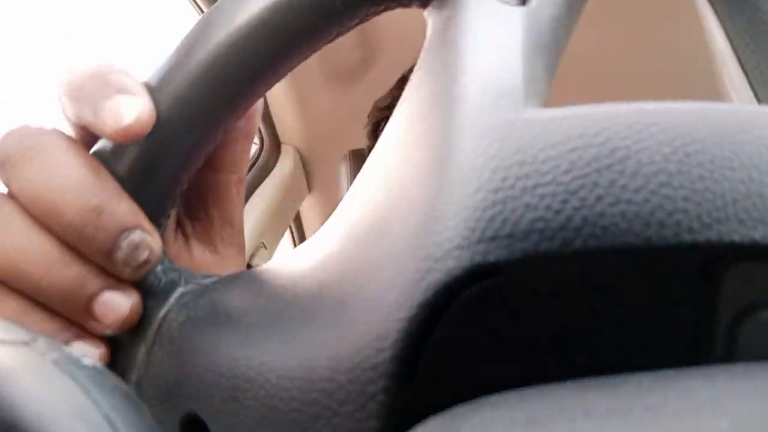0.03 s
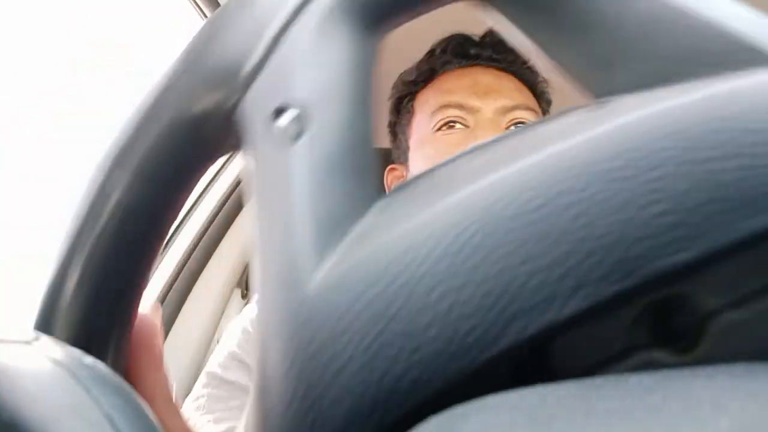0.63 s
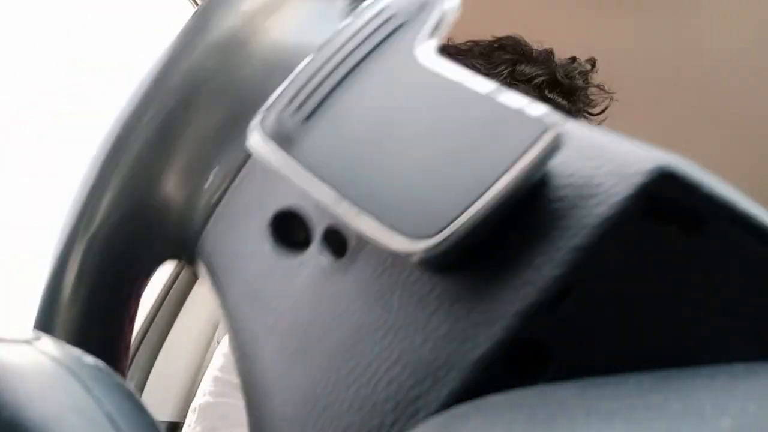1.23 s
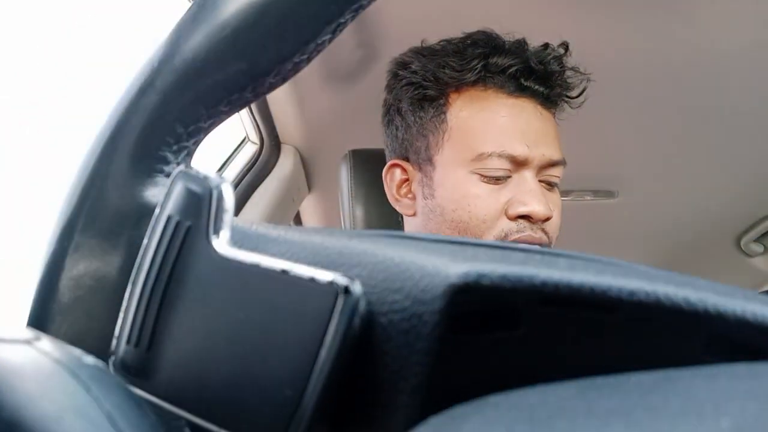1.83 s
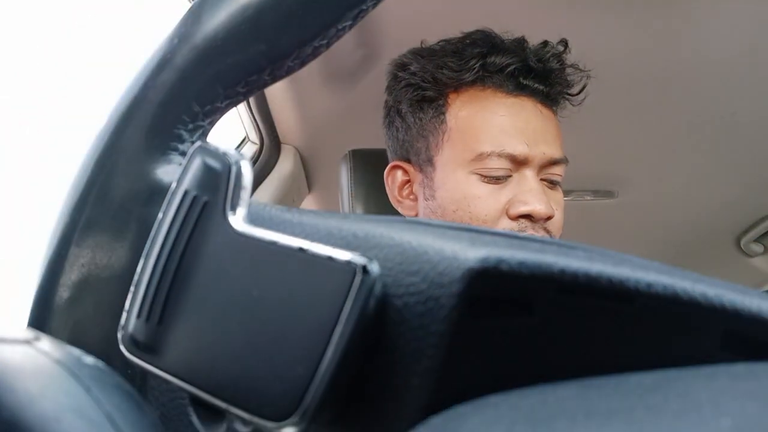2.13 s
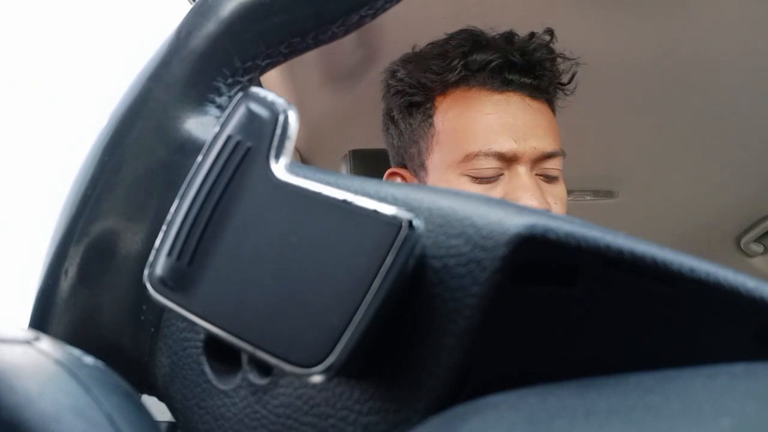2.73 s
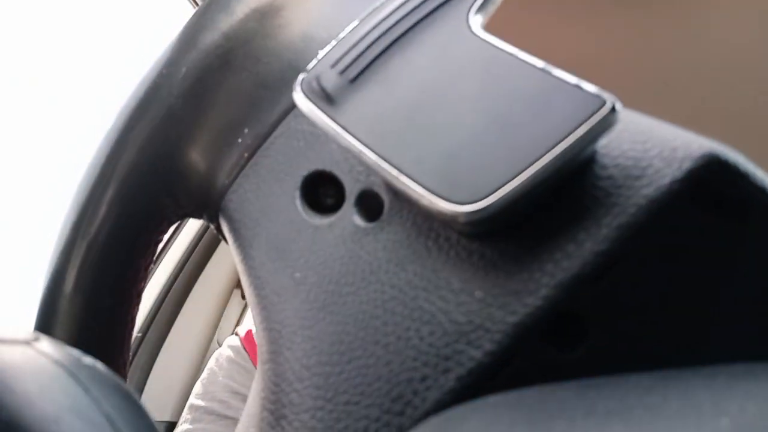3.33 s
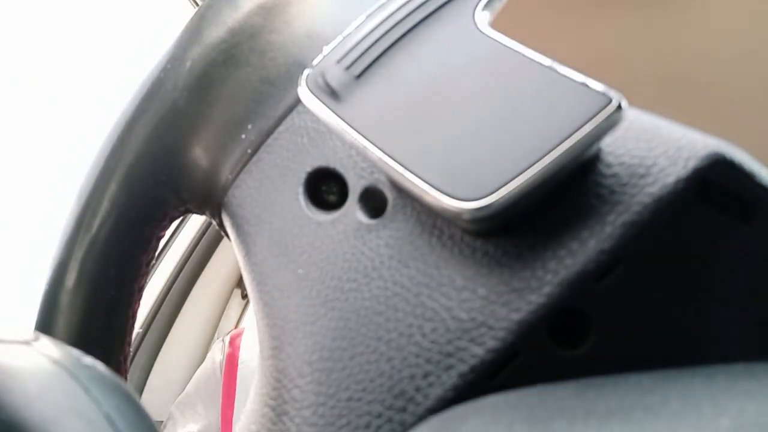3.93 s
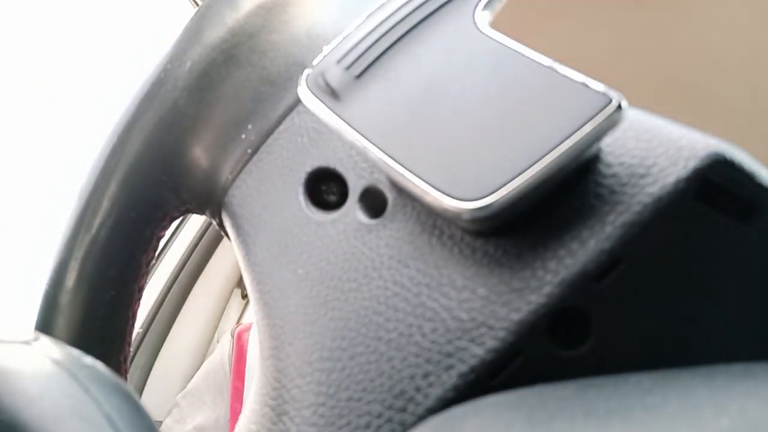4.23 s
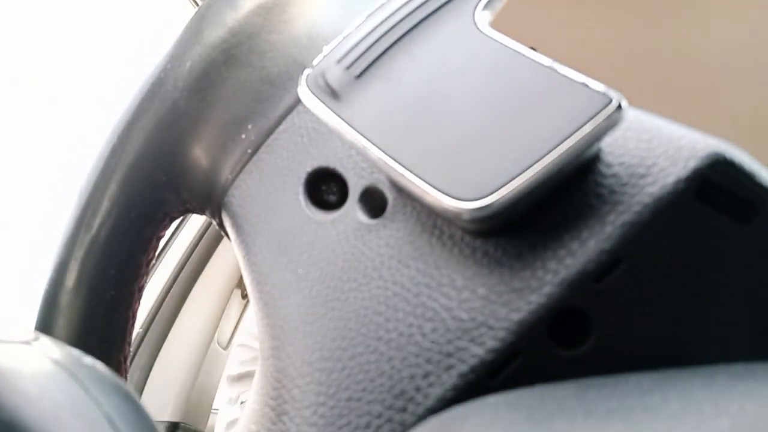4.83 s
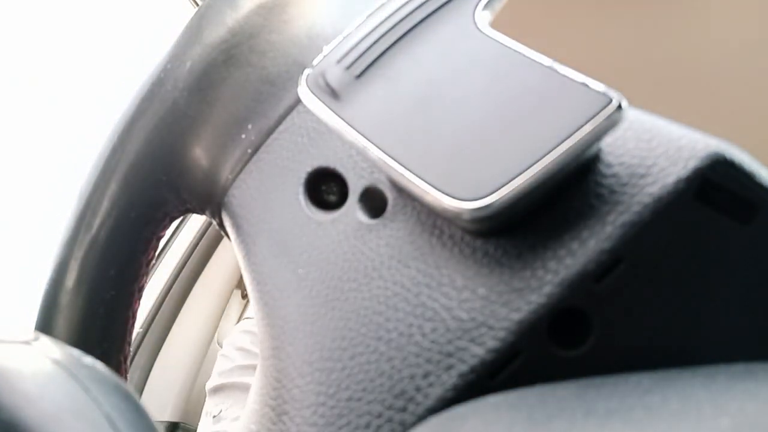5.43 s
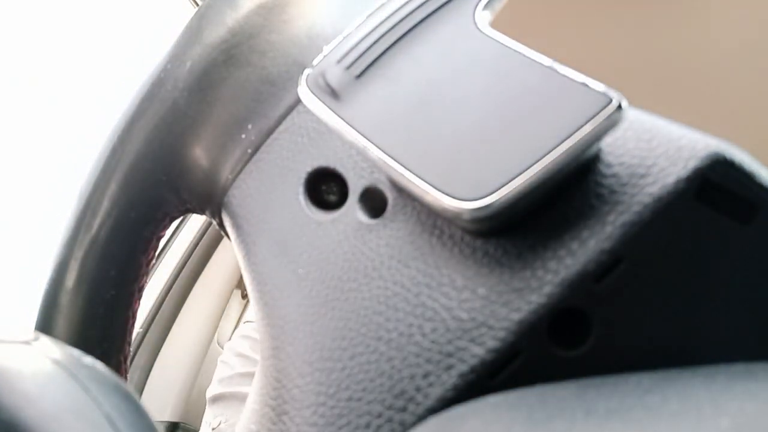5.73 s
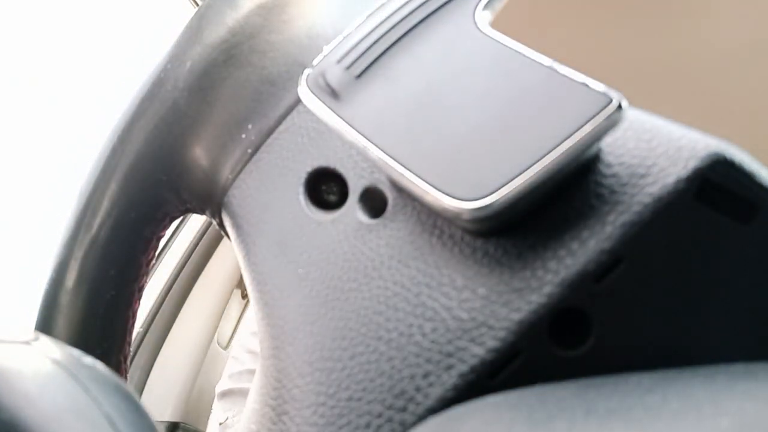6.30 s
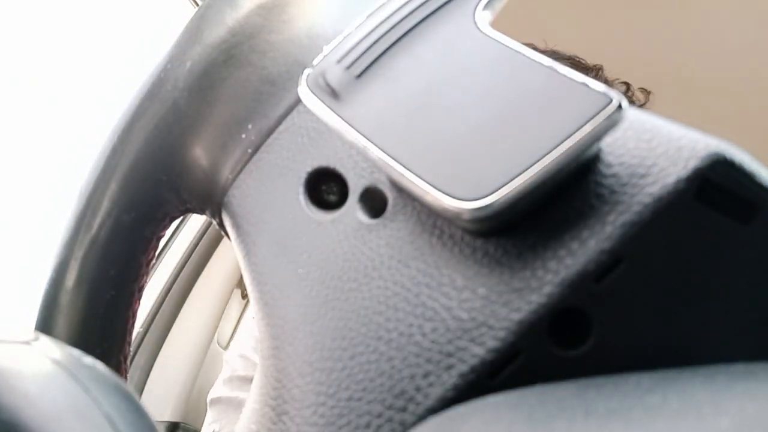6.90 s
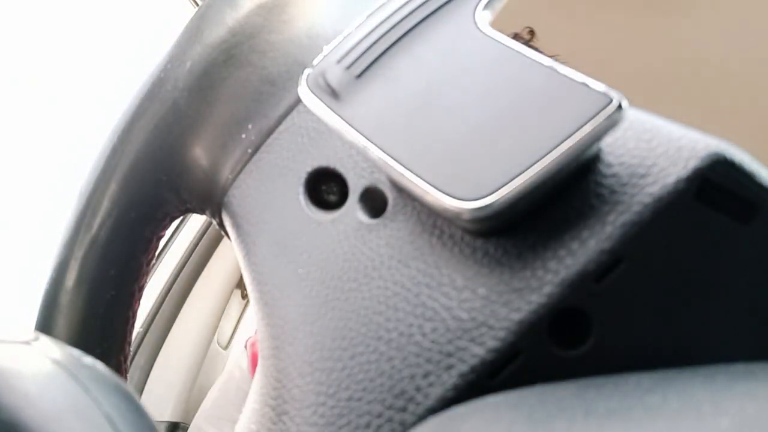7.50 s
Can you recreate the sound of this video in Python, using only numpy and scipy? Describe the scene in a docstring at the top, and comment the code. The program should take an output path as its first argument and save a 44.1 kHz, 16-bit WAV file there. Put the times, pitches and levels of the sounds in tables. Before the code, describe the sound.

Inside a quietly idling car, a steering wheel knocks, then locks with a hard clunk, followed by light plastic clicks and cloth rustle.

```python
"""Inside a parked, idling car, just behind the steering wheel. The engine hums through the body.
The wheel slides through a hand in countless tiny slips and knocks against its stop; then the latch
catches with one hard clunk that booms through the modes of the steering column.
Small plastic things click and ping as they are handled, cloth rustles, and the upholstery
sticks and slips in a faint squeak."""
import sys
import numpy as np
from scipy import signal
from scipy.fft import rfft, irfft, next_fast_len
from scipy.io import wavfile
from scipy.ndimage import uniform_filter1d

SR = 44100
rng = np.random.default_rng(int(sys.argv[2]) if len(sys.argv) > 2 else 0)


def file_out(sig):
    """Save sig as 16-bit WAV at sys.argv[1]."""
    # one column per channel
    cols = np.atleast_2d(sig).T
    # limit, then scale
    lim = np.clip(cols, -1, 1)
    pcm = np.round(lim * 32767).astype(np.int16)
    wavfile.write(sys.argv[1], SR, pcm)


N = 333396
TIME = np.arange(N) / SR


def from_db(db):
    """Decibels to gain."""
    return 10 ** (np.asarray(db) / 20)


def unit_rms(x):
    """Scale to rms 1."""
    return x / np.sqrt(np.mean(x ** 2) + 1e-20)


def curves(rows):
    """Interpolate rows (time [s], values...) to every sample."""
    times_s, *columns = np.transpose(rows)
    return [np.interp(TIME, times_s, values) for values in columns]


def add(track, start_s, sound):
    """Mix a sound in at start_s."""
    start = round(start_s * SR)
    track[start:start + len(sound)] += sound[:N - start]


def bandpass(x, low_hz, high_hz, order=2):
    """Causal Butterworth band-pass."""
    sos = signal.butter(order, [low_hz, min(high_hz, .45 * SR)], "band", fs=SR, output="sos")
    return signal.sosfilt(sos, x)


def resonance(x, hz, width_hz, boost_db):
    """Boost or cut one narrow band; a boosted band rings on."""
    peak = signal.iirpeak(hz, hz / width_hz, fs=SR)
    return x + (from_db(boost_db) - 1) * signal.lfilter(*peak, x + 1e-18)


def coloured(noise, spectrum):
    """Shape noise by rows (frequency [Hz], level [dB]); rms 1."""
    hz, db = np.transpose(spectrum)
    size = next_fast_len(N)
    bins_hz = np.maximum(np.arange(size // 2 + 1) * SR / size, 1)
    gain = from_db(np.interp(np.log(bins_hz), np.log(hz), db))
    return unit_rms(irfft(rfft(noise, size) * gain, size)[:N])


def drift(rate_hz):
    """Random curve through unit-normal knots."""
    knots = rng.standard_normal(8000)
    return np.interp(TIME * rate_hz, np.arange(len(knots)), knots)


# engine hum: (multiple of firing rate, rms level [dB])
ENGINE_ORDERS = [(2, -80), (3, -75), (4, -78), (9, -90), (12, -93), (21, -86)]
# rumble spectrum: (frequency [Hz], relative level [dB])
RUMBLE_SPECTRUM = [(25, -22), (60, -9), (118, 2), (160, -8), (260, -7), (350, -16.5), (450, -6.5),
                   (600, -13.5), (900, -19.5), (1760, -26.5), (3000, -39.5), (4500, -46), (7500, -41),
                   (10000, -51), (15000, -45.5)]
def engine_idle(firing_hz=27.3, wander=.012, sway_db=2.4, rumble_db=-73.5, drone_db=-79.5, throb=.17):
    """Engine orders hum through the body, over a rumble and a drone that throbs with each firing."""
    phase = 2 * np.pi * np.cumsum(firing_hz * (1 + wander * drift(2.5))) / SR
    hum = np.zeros(N)
    for multiple, db in ENGINE_ORDERS:
        amplitude = np.sqrt(2) * from_db(db + sway_db * drift(2.8))
        hum += amplitude * np.sin(multiple * phase + rng.uniform(0, 2 * np.pi))
    drone = from_db(drone_db) * unit_rms(bandpass(rng.standard_normal(N), low_hz=505.5, high_hz=594.5))
    rumble = from_db(rumble_db) * coloured(rng.standard_normal(N), RUMBLE_SPECTRUM)
    return hum + rumble + drone * (1 + throb * np.cos(phase))


def arm_on_seat():
    """The turning arm brushes dully against the seat."""
    level_db, = curves([(0, -78.5), (.27, -77.5), (.5, -70), (.75, -77.5),
                        (1.4, -80), (2.3, -79), (2.7, -100)])
    return from_db(level_db) * unit_rms(bandpass(rng.standard_normal(N), low_hz=172.4, high_hz=550))


# one glide per squeak: (time [s], pitch [Hz], level [dB])
SQUEAK_GLIDES = [
    [(0, 445, -73), (0.025, 423, -61), (0.06, 407, -84)],
    [(7.26, 286.6, -93), (7.32, 411, -67.5), (7.365, 447, -60), (7.42, 494, -80)],
    [(7.41, 245, -76.5), (7.46, 260.5, -58.5), (7.51, 251.5, -60.5), (7.56, 217, -60.5)],
]
def upholstery_squeaks(jitter=.078, shimmer_db=2.5, overtone_db=-19):
    """Stick and slip settle briefly into a rough gliding tone."""
    out = np.zeros(N)
    for glide in SQUEAK_GLIDES:
        hz, db = curves(glide)
        phase = 2 * np.pi * np.cumsum(hz * (1 + jitter * drift(400))) / SR
        gate = uniform_filter1d(1. * (TIME > glide[0][0]) * (TIME < glide[-1][0]), size=400)
        tone = unit_rms(np.sin(phase) + from_db(overtone_db) * np.sin(2 * phase))
        out += gate * from_db(db + shimmer_db * drift(80)) * tone
    return out


# steering column modes: (frequency [Hz], relative level [dB], t60 [s])
COLUMN_MODES = [(55, 0, .2), (88.4, -4, 0.18), (104, 1, 0.11), (124, 4.5, 0.07), (154.5, -6, 0.13),
                (194.1, -6.5, 0.083)]
# dull blows on the column: (time [s], level [dB], favoured pitch [Hz])
COLUMN_BLOWS = [(0.27, -55, 109), (0.765, -51.5, 85), (0.941, -63, 60), (1.019, -55, 59), (1.40, -53, 63.3),
                (1.458, -63, 58.7), (2.31, -62, 57.3), (2.947, -19.5, 113.7), (2.996, -28, 98),
                (3.024, -31.5, 101.1), (3.11, -52, 89), (3.54, -53, 100), (4.18, -48.5, 157.1),
                (4.191, -49, 83)]
def column_thumps(blows, t60_scale=1, spread_octaves=.48, rise_s=.0031):
    """A soft blow rings the column's modes, most of all those near its favoured pitch."""
    t = TIME[:SR // 2]
    hz, mode_db, t60_s = np.transpose(COLUMN_MODES)[:, :, None]
    signs = (-1) ** np.arange(len(hz))[:, None]
    envelopes = from_db(mode_db - 60 * t / (t60_s * t60_scale)) * (1 - np.exp(-t / rise_s))
    modes = signs * envelopes * np.sin(2 * np.pi * hz * t)
    out = np.zeros(N)
    for start_s, db, pitch_hz in blows:
        weights = np.exp(-.5 * (np.log2(hz / pitch_hz) / spread_octaves) ** 2)
        add(out, start_s, from_db(db) * np.sum(weights * modes, axis=0))
    return out


# strokes of skin and cloth, plus the cabin's fading wash just after the latch (rows at 2.945 and 2.985 s):
# (start [s], length [s], swish [dB], hiss [dB])
HAND_STROKES = [(0.676, 0.097, -74, -85.5), (0.995, 0.49, -76, -86), (1.32, 0.23, -75.5, -85.5),
                (2.945, 0.1, -71.5, -101), (2.985, 0.3, -83, -102), (3.7, 0.62, -88.5, -104),
                (4.433, 0.26, -72, -78.5), (4.704, 0.35, -68, -94.5), (5.505, 0.06, -71.5, -104),
                (5.687, 0.077, -74, -100), (5.775, 0.05, -66.5, -101), (5.949, 0.035, -83.5, -99),
                (6.63, 0.29, -83, -101), (7.104, 0.2, -64.5, -84), (7.226, 0.2, -62, -72.5),
                (7.425, 0.12, -64, -69.5)]
def stroke_gains(attack_share=.5, release_s=.037, rest_swish_db=-99, rest_hiss_db=-109, fidget_db=3.5):
    """Swish and hiss gains: strokes swell, hold and fade; the hand never lies quite still."""
    power = (from_db([[rest_swish_db], [rest_hiss_db]]) * from_db(fidget_db * drift(7))) ** 2
    for start_s, length_s, swish_db, hiss_db in HAND_STROKES:
        swell = np.clip((TIME - start_s) / (attack_share * length_s), 0, 1)
        release = np.exp(-np.clip((TIME - start_s - length_s) / release_s, 0, 20))
        power += (from_db([[swish_db], [hiss_db]]) * swell * release) ** 2
    return np.sqrt(power)


def moving_echoes(x, gain=.69, travel_s=.0006, count=6):
    """Paths via glass and dashboard change as the hand moves, combing its sound with gliding peaks."""
    out = x
    for lag_s in np.linspace(.0015, .009, count) * rng.uniform(.87, 1.2, count):
        out = out + gain * np.interp(TIME - lag_s - travel_s * drift(2), TIME, x)
    return out


# latch and trim modes: (frequency [Hz], width [Hz], boost at full coupling [dB])
TRIM_MODES = [(915, 40, 5), (995, 25, 4), (1345, 70, 6), (1770, 30, 8), (1972, 20, 10), (2327, 20, 10),
              (2826, 22, 12), (5190, 45, 13), (6430, 60, 9), (7870, 40, 10), (8825, 60, 17),
              (11100, 60, 13), (14600, 90, 13)]
def trim_ring(x, coupling):
    """The panels ring in narrow bands, more so the firmer the source is joined to them."""
    for hz, width_hz, boost_db in TRIM_MODES:
        x = resonance(x, hz, width_hz, coupling * boost_db)
    return x


# friction spectra: (frequency [Hz], relative level [dB])
RIM_SPECTRUM = [(700, -30), (1450, -2), (1650, -5), (1850, 5), (2080, 8), (2450, -5.5), (2750, 3.5),
                (3300, 1.5), (3900, -10.5), (4500, -56)]
CLOTH_SPECTRUM = [(500, -29.5), (850, -14), (1000, -8.5), (1180, -3), (1480, -1.5), (1850, -0.5),
                  (2190, -4), (2540, -11), (2900, -10.5), (3500, -17), (4600, -47.5)]
HISS_SPECTRUM = [(4800, -33.5), (5700, -9), (6700, 2), (8500, 1.5), (9500, -17.5), (15000, -17)]
def rubbing(grain_db=4.5, flutter_db=2.04, flutter_hz=60, catches_per_s=12, catch_s=.006, catch_db=-1.5):
    """Clumps of tiny slips make a swish with a hiss above it: first skin on the rim, then cloth."""
    swish_gain, hiss_gain = stroke_gains()
    slips = rng.standard_normal(N)
    slips *= from_db(grain_db * rng.standard_normal(N) + flutter_db * drift(flutter_hz))
    # skin now and then sticks and lets go
    onsets = rng.random(N) < catches_per_s / SR
    catches = signal.lfilter([1], [1, -np.exp(-1 / (catch_s * SR))], onsets + 1e-18)
    slips *= 1 + from_db(catch_db) * catches
    slips = trim_ring(moving_echoes(slips), coupling=.51)
    on_rim = np.interp(TIME, [1.8, 2.6], [1, 0])
    swish = on_rim * coloured(slips, RIM_SPECTRUM) + (1 - on_rim) * coloured(slips, CLOTH_SPECTRUM)
    return swish_gain * swish + hiss_gain * coloured(slips, HISS_SPECTRUM)


# small loose parts: (time [s], pitch [Hz], level [dB], t60 [s])
PART_PINGS = [(0.901, 1520, -42.5, 0.047), (1.933, 3340, -66, .07), (5.388, 5870, -74.5, 0.073),
              (5.400, 3313, -66, 0.086), (5.975, 3495, -78, 0.13), (6.730, 2160, -70, 0.16),
              (7.074, 1092, -46, 0.081), (7.122, 943, -33.5, 0.061)]
def loose_part_pings(rise_s=.00067, detune_share=.09):
    """Each part rings with a tight cluster of five damped modes around one note."""
    t = TIME[:SR // 4]
    out = np.zeros(N)
    for start_s, hz, db, t60_s in PART_PINGS:
        detune, half_turns = rng.uniform(-1, 1, (2, 5, 1))
        modes_hz = hz * (1 + detune_share * detune)
        cluster = np.sin(2 * np.pi * modes_hz * t + np.pi * half_turns).sum(axis=0)
        envelope = from_db(db - 60 * t / t60_s) * (1 - np.exp(-t / rise_s))
        add(out, start_s, envelope * unit_rms(cluster) / np.sqrt(2))
    return out


# knock, body, crack, tick, sizzle: (low [Hz], high [Hz], t60 scale, rise scale, hardness weight)
IMPACT_BANDS = [(820, 1420, .95, 0.61, -0.035), (210, 590, 0.7, 2.2, -0.42), (1480, 3064, .72, 1, 0.19),
                (6770, 9100, 0.61, .8, 0.99), (9700, 16000, .72, .7, 0.99)]
def impacts(rows, colour_db, ring_db, ring_width_hz, rise_s, tail_db, tail_t60_s=.17, grain_db=1):
    """Dense reflections die away, with one random ring per band; harder is brighter, lows build last."""
    t = TIME[:SR // 3]
    tail = from_db(tail_db - 60 * t / tail_t60_s)
    out = np.zeros(N)
    for start_s, db, hardness_db, t60_s in rows:
        scatter, grain = rng.standard_normal((2, len(t)))
        echoes = unit_rms(scatter * from_db(grain_db * grain))
        for (low_hz, high_hz, t60_scale, rise_scale, weight), band_db in zip(IMPACT_BANDS, colour_db):
            attack = 1 - np.exp(-t / (rise_s * rise_scale))
            decay = from_db(-60 * t / (t60_s * t60_scale)) + tail
            burst = bandpass(echoes * attack * decay, low_hz, high_hz, order=3)
            ring = resonance(burst, rng.uniform(low_hz, high_hz), ring_width_hz, ring_db)
            gain = from_db(db + band_db + weight * hardness_db) * np.sqrt(np.mean(decay ** 2))
            add(out, start_s, gain * unit_rms(ring))
    return out


# light plastic contacts: (time [s], relative level [dB], hardness [dB], base t60 [s])
PLASTIC_CLICKS = [ (0.9015, -53, 1.5, 0.097), (0.919, -58.5, -6, 0.16), (1.938, -79, 16, .15),
                  (2.8415, -59, -6, 0.15), (3.636, -64, -8, 0.12), (4.803, -57, -0.5, 0.15),
                  (5.001, -62, -2, 0.17), (5.020, -59.5, -12, .12), (5.345, -78.5, 14.5, 0.15),
                  (5.392, -77.5, 7, 0.21), (5.519, -57.5, -22, 0.15), (5.556, -57.5, -14, 0.086),
                  (5.680, -67, 14, 0.11), (5.697, -64, 1, .18), (5.808, -60.5, 3, 0.19),
                  (6.594, -58, 10.5, 0.12), (6.607, -62, -21, 0.11), (6.647, -68, -10, 0.16),
                  (6.939, -50.5, 3, 0.13), (6.947, -52.5, 11, .09), (6.957, -45, 12, 0.1),
                  (7.0734, -66.5, -1, 0.24), (7.099, -60, 10.5, 0.37), (7.122, -41, 6, 0.09),
                  (7.174, -57.5, -21, 0.079), ]
# click colour: (level [dB]) per impact band
CLICK_BANDS_DB = [-2.5, -16, -2, -13.5, -26.5]
def plastic_clicks(gain_db=-3):
    """Small plastic things click as they are handled, coloured by the hollow column cover."""
    clicks = impacts(PLASTIC_CLICKS, CLICK_BANDS_DB,
                     ring_db=9, ring_width_hz=41.6, rise_s=.002, tail_db=-34)
    return from_db(gain_db) * resonance(clicks, hz=1240, width_hz=420, boost_db=8.5)


# hard strikes and softer seatings: (time [s], relative level [dB], hardness [dB])
WHEEL_KNOCKS = [(2.424, -53, 0), (2.436, -41.5, 7.5), (2.451, -40.5, -14), (2.480, -39, 0),
                (2.489, -37.5, 9.5), (2.496, -39, -24.5), (2.557, -45.5, -5.5), (2.576, -39, -8),
                (2.593, -43.5, -24.5), (3.407, -58.5, 6), (3.4158, -52, -6), (4.181, -60, -4.5),
                (4.192, -67.5, -37.5), (6.962, -55, -0.5), (6.982, -63.5, -23)]
# knock colour: (level [dB]) per impact band
KNOCK_BANDS_DB = [1, 0.5, -2, -14, -40]
def wheel_knocks(clack_gain_db=-2.5, base_t60_s=.099, thud_gain_db=9.5, thud_hz=184):
    """The wheel meets its stop: a heavy plastic clack, and a thud in the column."""
    strikes = [(*knock, base_t60_s) for knock in WHEEL_KNOCKS]
    clacks = impacts(strikes, KNOCK_BANDS_DB, ring_db=12, ring_width_hz=26, rise_s=.0019, tail_db=-28)
    clacks = resonance(clacks, hz=1120, width_hz=170, boost_db=5)
    # softer knocks shake the column more
    blows = [(start_s, db + thud_gain_db - .34 * hardness_db, thud_hz)
             for start_s, db, hardness_db in WHEEL_KNOCKS]
    thuds = column_thumps(blows, t60_scale=.7)  # the hand on the wheel damps the ring
    return from_db(clack_gain_db) * clacks + thuds


# latch catching, then settling: (time [s], relative level [dB], hardness [dB], base t60 [s])
LATCH_BLOWS = [(2.9155, -38.5, -13, .08), (2.924, -23.5, 0, .075), (2.934, -21.5, 2, .07),
               (2.9414, -16, 0.5, .06), (2.949, -22.5, 1, .07), (2.962, -32, -6.5, .08),
               (2.995, -63, -43.5, .18)]
# latch colour: (level [dB]) per impact band
LATCH_BANDS_DB = [0, -1, -9.5, -13, -16]
def column_latch(gain_db=-2):
    """Metal catches in a quick run of blows, all ringing the same modes."""
    blows = impacts(LATCH_BLOWS, LATCH_BANDS_DB,
                    ring_db=.5, ring_width_hz=100, rise_s=.0005, tail_db=-33.5)
    return from_db(gain_db) * trim_ring(blows, coupling=1)


def scene():
    """All sources sum at one microphone."""
    engine = engine_idle()
    friction = arm_on_seat() + upholstery_squeaks() + rubbing()
    small_things = loose_part_pings() + plastic_clicks()
    steering = column_thumps(COLUMN_BLOWS) + wheel_knocks() + column_latch()
    return (engine + friction + small_things + steering)[None]


def record(dry, cutoff_hz=15500):
    """The microphone has a hollow in the low treble; the top is cut."""
    hollowed = resonance(dry, hz=4750, width_hz=220, boost_db=-8)
    lowpass = signal.ellip(10, .2, 80, cutoff_hz, fs=SR, output="sos")
    return signal.sosfilt(lowpass, hollowed)


dry = scene()
out = record(dry)
file_out(out)
```